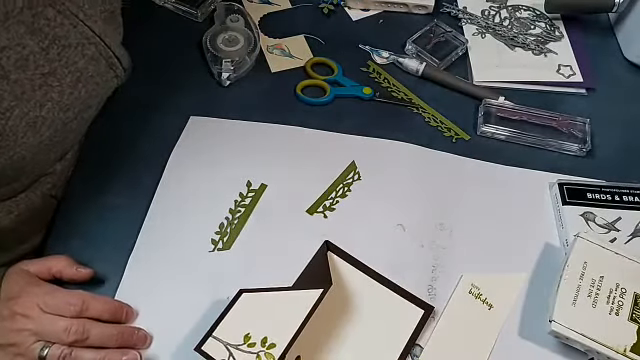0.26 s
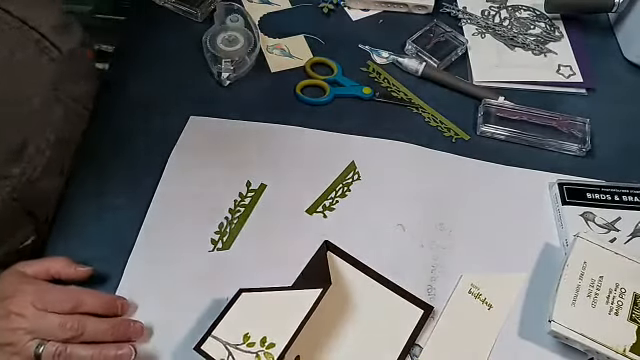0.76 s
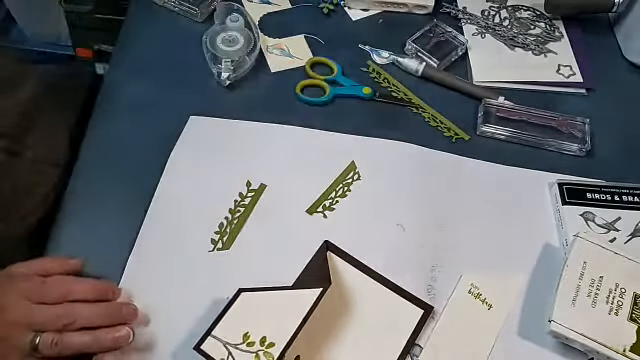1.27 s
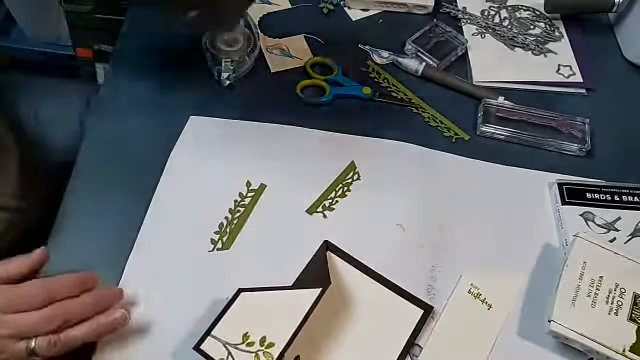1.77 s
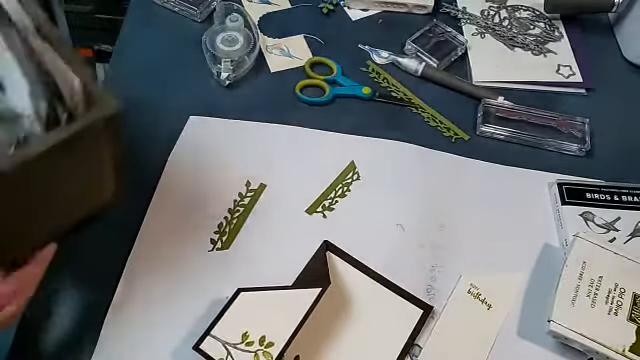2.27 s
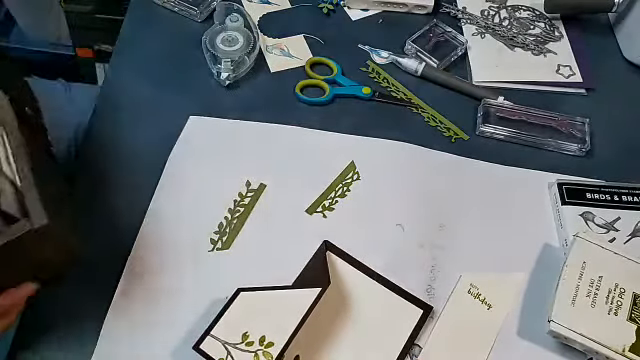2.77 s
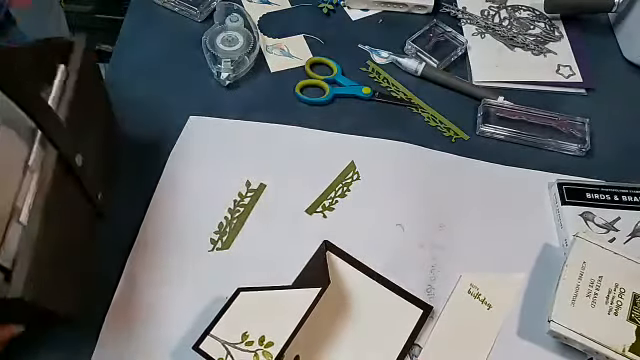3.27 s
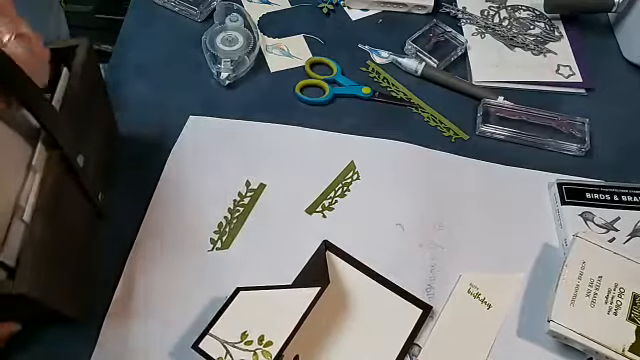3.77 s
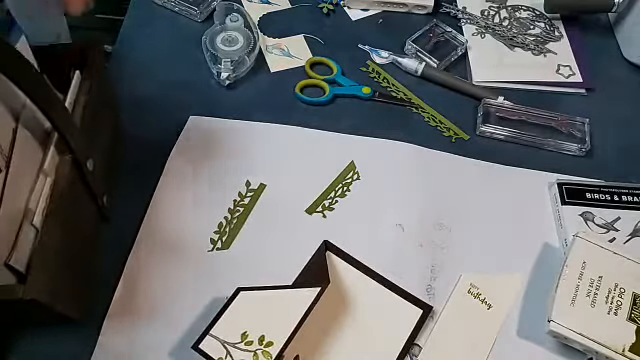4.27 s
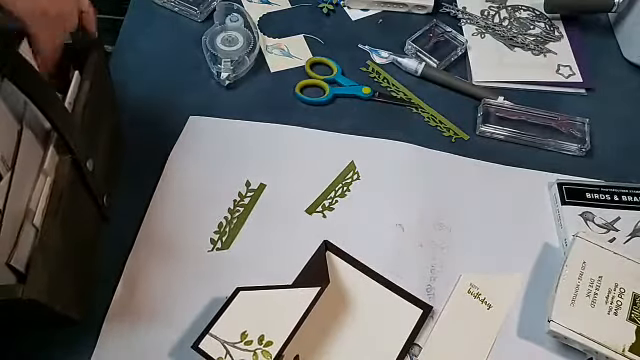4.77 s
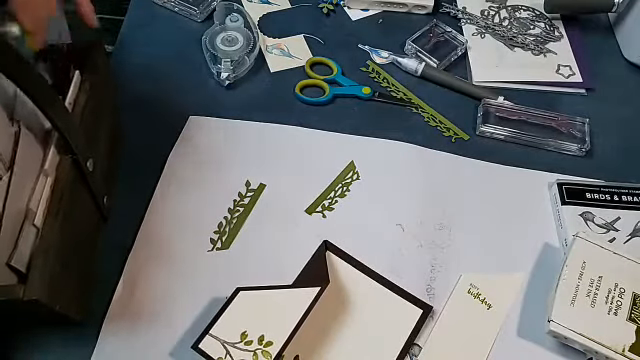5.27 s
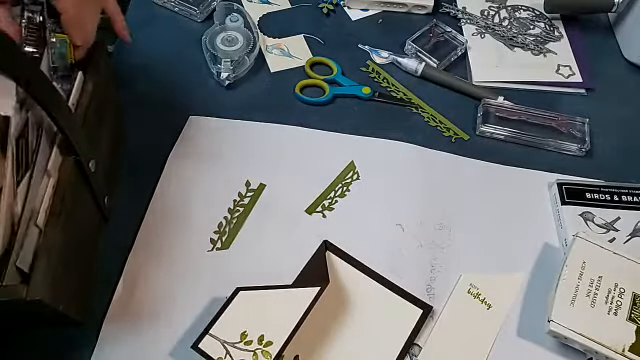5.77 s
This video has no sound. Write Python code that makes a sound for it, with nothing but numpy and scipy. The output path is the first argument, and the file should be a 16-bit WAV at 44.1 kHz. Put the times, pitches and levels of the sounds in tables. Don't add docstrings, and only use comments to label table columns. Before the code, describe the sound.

Sharp clicks and paper scuffs lead into a drawer slamming with a low thud. Quiet follows, broken by dull taps, a muffled rattle and rising creaky ticks. A wooden box lands, and a hand digs through it: irregular bursts of rubbing cards, bright plastic snaps, tiny rings and hollow knocks, until the end. Close-miked in a small, fairly dry room over faint hum and hiss.

```python
import sys
import numpy as np
from scipy import signal
from scipy.fft import rfft, irfft, next_fast_len
from scipy.io import wavfile
from scipy.ndimage import uniform_filter1d

SR = 44100
rng = np.random.default_rng(int(sys.argv[2]) if len(sys.argv) > 2 else 0)


def master_out(mix):
    frames = np.transpose(np.atleast_2d(mix))
    ceiling = np.clip(frames, -1, 1)
    pcm = np.round(ceiling * 32767).astype(np.int16)
    wavfile.write(sys.argv[1], SR, pcm)


def boost(x):
    u = np.asarray(x, float) / 20
    return 10 ** u


N = 265702
HIT_N = 6000
HIT_T_S = np.arange(HIT_N) / SR


def evened(x):
    return x / np.sqrt(np.mean(x ** 2) + 1e-20)


def peaked(x):
    return x / np.sqrt(uniform_filter1d(x ** 2, size=130).max() + 1e-20)


def read(points, hz):
    point_hz, value = np.transpose(points)
    return np.interp(np.log(hz + 1), np.log(point_hz + 1), value)


def add(mix, start_s, sound):
    part = mix[round(start_s * SR):][:len(sound)]
    part += sound[:len(part)]


def colour(x, points):
    size = next_fast_len(len(x))
    gain = boost(read(points, np.fft.rfftfreq(size, 1 / SR)))
    return evened(irfft(rfft(x, size) * gain, size)[:len(x)])


def ring(x, pitch_hz, width_hz):
    pole = np.exp((2j * np.pi * pitch_hz - np.pi * width_hz) / SR)
    return (1 - abs(pole)) * signal.lfilter([1], [1, -pole], x).real


def ring_twice(x, pitch_hz, width_hz):
    return ring(ring(x, pitch_hz, width_hz), pitch_hz, width_hz)


def wood(x, body):
    lowest_hz = min(pitch_hz for pitch_hz, width_hz, level_db in body)
    x = signal.sosfilt(signal.butter(2, 0.5 * lowest_hz, "high", fs=SR, output="sos"), x)
    return evened(sum(boost(level_db) * ring_twice(x, pitch_hz, 2.64 * width_hz) / np.sqrt(width_hz)
                      for pitch_hz, width_hz, level_db in body))


def fall(t60_s, rise_s):
    return (1 - np.exp(-HIT_T_S / rise_s)) * boost(-60 * HIT_T_S / max(t60_s, .01))


# pitch_hz, density_db [dB per Hz]
HUM = [(15, -62.5), (25, -24.5), (41, -13.5), (65, -3), (80, -16), (108, -25), (300, -36), (600, -91)]
# start_s, level_db
SWAY = [(0.0, -70), (0.35, -62), (0.48, -57), (0.64, -60), (0.85, -65.5), (1.49, -68.5), (1.61, -64),
        (1.99, -66.5), (2.7, -69), (2.77, -65), (3.2, -60.5), (3.52, -59.5), (3.64, -66.5), (4.07, -60),
        (4.19, -65.5), (4.49, -65), (4.93, -64.5), (6.02, -65)]
# pitch_hz, density_db [dB per Hz]
HISS = [(210, -34.5), (350, -1), (1610, -3), (4040, -7.5), (8260, -16), (11500, -7), (13700, -1),
        (15600, -4.5)]


def hum():
    rumble, hiss = rng.standard_normal((2, N))
    sway_db = 2.5 + np.interp(np.arange(N) / SR, *np.transpose(SWAY))
    return boost(sway_db) * colour(rumble, HUM) + boost(-78.5) * colour(hiss, HISS)


def patchy(x, patchy_db):
    z = signal.stft(x, nperseg=256, noverlap=192)[2]
    patches = uniform_filter1d(rng.standard_normal(z.T.shape), size=22, axis=0)
    patches = uniform_filter1d(patches, size=5, axis=1)
    z = z * boost(patchy_db * evened(patches).T)
    return evened(signal.istft(z, nperseg=256, noverlap=192)[1][:N])


# start_s, pitch_hz
RUNNER = [
    (0.336, 734),
    (0.398, 880),
    (0.459, 1055),
    (0.511, 916),
    (0.902, 882),
]


def runner(grain):
    pitch_hz = np.interp(np.arange(N) / SR, *np.transpose(RUNNER))
    turn = np.exp(2j * np.pi * np.cumsum(pitch_hz) / SR)
    return evened((turn * ring_twice(grain, 0, 500)).real)


# pitch_hz, width_hz, level_db
BOX = [(121.3, 53, -1), (241, 92, 0), (474, 140, 3.5), (574, 86, -4), (753, 120, 0), (990, 140, -5.5)]
# pitch_hz, density_db [dB per Hz]
PAPER = [(500, -33.5), (1100, -3.5), (1600, -8), (2300, -4), (3000, -9.5), (4200, -10.5), (6000, -19),
         (9000, -29)]
# pitch_hz, level_db
SHEEN = [(3500, -13), (6000, 2.5), (9000, -3), (15000, 2), (16000, 1.5)]
# start_s, length_s, rub_db, wood_rel_db,
# hiss_rel_db
STROKES = [(0.0, 0.075, -54, -7.5, -6), (0.159, .15, -57.5, 0.5, -3.5), (0.337, 0.14, -64.5, 10, -9),
           (0.487, 0.072, -58, 17, -27), (0.59, 0.17, -61, 7, -9), (1.45, 0.4, -82, 4, -12.5),
           (1.957, 0.14, -63, -1.5, -21), (2.255, 0.34, -76, -8, 4), (2.638, 0.073, -67, -3.5, 5),
           (2.819, 0.047, -78.5, -24, 7), (2.988, 0.18, -73.5, -2.5, -12), (3.337, 0.18, -58.5, 4, -11.5),
           (3.615, 0.11, -65, -4, 7.5), (3.728, 0.26, -54.5, 3, -11.5), (3.921, 0.18, -64.5, -7, -5),
           (4.138, 0.14, -60, -2, -0.5), (4.536, .15, -59, -3, -7.5), (4.726, 0.13, -53, 1, -8),
           (4.922, 0.16, -73.5, -11, 4.5), (5.263, 0.097, -68, -10, 3), (5.394, 0.083, -67, 9.5, -6),
           (5.548, 0.23, -66, 2.5, -10), (5.79, 0.27, -78.5, -9.5, 1.5),
           (.53, 0.04, -63, -11.5, 11), (.22, 0.097, -69, -9, -9), (5.432, 0.062, -62.5, 5, -16),
         (7.8, .06, -71.5, 1, -8), (5.98, .04, -81.5, -5, 7.5), (2.7, 0.57, -83, -11, -2),
         (3.67, 0.035, -57.5, -2, -1), (2.4, 0.059, -56, -8.5, -5), (4, 0.042, -64.5, 2, -8),
         (0.8, 0.065, -79, -8, 2.5), (4.331, 0.061, -72, -6, -8), (5.1, 0.21, -85, -2, 7.5)]


def rubbing():
    rise_db_per_s, fall_db_per_s, slips_per_s = 898.5, 264, 900
    card_hz = 1590
    t_s = np.arange(N) / SR
    clumps = boost(0.61 * evened(uniform_filter1d(rng.standard_normal(N), size=500)))
    slips = boost(3 * np.minimum(rng.exponential(1, N), 2.5)) * (rng.random(N) < slips_per_s / SR)
    slips = evened(slips * rng.standard_normal(N))
    grain = patchy(clumps * (slips + 2 * rng.standard_normal(N)), 2)
    paper = evened(colour(grain, PAPER) + .5 * evened(ring(grain, card_hz, 98)))
    scraping = (t_s > .335) & (t_s < .56)
    body = np.where(scraping, runner(grain), wood(grain, BOX))
    layers = [paper, body, colour(grain, SHEEN)]
    coarse_s, power = t_s[::64], 0
    for start_s, length_s, rub_db, wood_rel_db, hiss_rel_db in STROKES:
        lost_db = rise_db_per_s * np.maximum(start_s - coarse_s, 0)
        lost_db += fall_db_per_s * np.maximum(coarse_s - start_s - length_s, 0)
        power = power + boost(rub_db - lost_db + np.array([[0], [wood_rel_db], [hiss_rel_db]])) ** 2
    return sum(layer * np.interp(t_s, coarse_s, np.sqrt(p)) for layer, p in zip(layers, power))


# start_s, click_db, treble_rel_db, t60_s
DRAWER_FRONT = [(.0244, -39.5, 1.5, 0.046), (.0535, -28, -4, 0.063), (.069, -36.5, -26, 0.043),
                (.158, -49, 8, 0.032), (.1615, -38, 8, 0.043), (.1645, -33, 9.5, 0.064),
                (.4374, -41, 5, 0.037), (.4976, -42, -28, .038), (.506, -36.5, -34, 0.22),
                (.558, -23, 3, .053), (.7245, -34, -13, 0.071)]
DRAWER_LOAD = [
    (.3383, -44, -5, 0.033),
    (.5305, -32, 8.5, 0.081),
    (.5763, -27, -4.5, 0.045),
    (.635, -62.5, -10.5, .053),
    (.6644, -43, -7, .034),
    (.6728, -28.5, -1.5, 0.058),
    (.7316, -36.5, 3, 0.052),
]
CARDS = [(2.8432, -67.5, 12, 0.2), (3.0394, -62, 4, 0.26), (3.3178, -55.5, 0.5, 0.086),
         (3.3433, -43, -10, 0.25), (3.3633, -37, -3, 0.15), (3.465, -46, -17, .12),
         (3.6035, -66, -27, 0.19), (3.6344, -70, 3, .082), (3.7277, -34.5, -8.5, .052),
         (3.7371, -30.5, -7, 0.11), (4.134, -42, -2.5, 0.04), (4.2183, -37, -25, 0.055),
         (4.2363, -38.5, -26.5, 0.065), (4.3374, -50, -29.5, 0.029), (4.8054, -22, -24, .037),
         (5.2631, -71, -1, .21), (5.2776, -52, -6.5, .05), (5.3038, -45.5, 3.5, .038),
         (5.3314, -39, -8, 0.078), (5.3976, -38.5, -5, 0.051), (5.453, -27, -37, .07),
         (5.667, -29.5, -3, 0.049), (5.7111, -33.5, 2.5, 0.062)]
CASES = [(3.5203, -37.5, -5.5, 0.067), (3.7694, -19.5, -23, 0.049), (3.7977, -27, -6.5, 0.07),
         (3.8193, -36, -30, 0.074), (3.838, -35.5, -1, 0.053), (3.9429, -26, -1.5, 0.11),
         (4.2719, -37.5, -9, 0.044), (4.5977, -36.5, -15, 0.1), (4.744, -40.5, -7.5, 0.32),
         (4.7571, -34.5, -15, 0.15), (4.7799, -28, -15, 0.17)]
BLOCKS = [
    (3.408, -40.5, -17, 0.064),
    (3.4959, -39, -21, 0.11),
    (4.5592, -53, -15, 0.034),
    (5.434, -49, -25, .1),
    (5.5275, -50.5, -8, .08),
    (4.5716, -36.5, -13, 0.023),
    (5.5757, -39, -16, 0.16),
    (5.5982, -30.5, -13, 0.046),
]
PADS = [(3.1178, -72, 22.5, 0.17), (3.1198, -49.5, -5.5, 0.14), (3.89, -37.5, -4, 0.11),
        (3.899, -37.5, -5, 0.12), (3.9065, -33.5, 3.5, 0.089), (3.924, -36.5, 1, 0.02),
        (3.9348, -28, -0.5, 0.056), (3.9604, -37.5, 2.5, 0.079), (4.5137, -48.5, 10, 0.1),
        (4.6287, -31.5, 6, 0.066), (4.6668, -37.5, 3.5, 0.1), (4.8304, -24.5, -18, 0.084),
        (5.443, -34.5, -34, 0.15), (5.7022, -19.5, -35, 0.027)]
BEADS = [(3.4511, -43.5, -10, 0.028), (4.0482, -50, -10, 0.063), (4.7255, -38.5, -0.5, 0.043),
         (4.793, -34, -11, .03), (3.366, -46, -4, 0.025), (4.8434, -40, -4, 0.16),
         (4.9107, -52, -24, 0.028), (4.9348, -46.5, 1, 0.046), (4.9688, -58, -11, 0.044),
         (4.98, -49, -2.5, 0.12), (5.0134, -44.5, -24, 0.048), (5.0409, -46, 1, 0.052),
         (5.1185, -62, -1.5, 0.098), (5.3478, -35.5, 6, 0.08)]
# pitch_hz, width_hz, level_db
PLASTIC = [(3000, 850, -4), (3513, 300, -6), (4340, 1100, 3), (4860, 350, -7.5), (5200, 350, -4)]


def clicks():
    # contacts, ring_hz, upper_rel_db
    objects = [(DRAWER_FRONT, 2450, -5.5), (DRAWER_LOAD, 1900, -9), (CARDS, 1580, -5.5),
               (CASES, 1644, 0.64), (BLOCKS, 1340, -15), (PADS, 1930, -3.3), (BEADS, 2630, 1.67)]
    upper_per_treble = 0.77
    rows = sorted((*row, ring_hz, upper_db) for contacts, ring_hz, upper_db in objects for row in contacts)
    out, noise = np.zeros(N), rng.standard_normal((len(rows), 3, HIT_N))
    detune = rng.uniform(0.86, 1.1, (len(rows), len(PLASTIC)))
    crack = 1.5 * fall(0.0066, 0.000067)
    slide_in = 0.31 * fall(0.054, .0002)[:880][::-1]
    for row, (low, high, snap), shifts in zip(rows, noise, detune):
        start_s, click_db, treble_db, t60_s, ring_hz, upper_db = row
        sudden = boost(-2 * max(treble_db, 0))
        scuff = np.r_[sudden * slide_in, fall(t60_s, .012 * t60_s) + crack][:HIT_N]
        sound = evened(ring(low * scuff, ring_hz, 320))
        sound = peaked(sound + 0.57 * colour(low, PAPER) * evened(scuff))
        brief = high * scuff * boost(-300 * HIT_T_S)
        upper = sum(boost(level_db) * ring_twice(brief, pitch_hz * shift, width_hz)
                    for (pitch_hz, width_hz, level_db), shift in zip(PLASTIC, shifts))
        sound += boost(upper_db + upper_per_treble * treble_db) * peaked(upper)
        sound += boost(treble_db) * peaked(colour(snap, SHEEN) * scuff)
        add(out, start_s - 900 / SR, boost(click_db - 7) * sound)
    return out


# start_s, level_db, pitch_hz, t60_s
THUMPS = [(0.046, -44, 76, 0.12), (0.531, -23.5, 180, 0.15), (0.538, -21.5, 76.6, 0.1),
          (0.555, -24.5, 166, 0.15), (0.574, -29.5, 60, 0.099), (0.675, -29.5, 98.3, 0.24),
          (0.733, -38, 110, 0.15), (1.789, -43, 87.3, 0.024), (2.028, -53, 230, 0.094),
          (2.985, -47, 115.3, 0.14), (3.008, -39, 60.2, 0.038), (3.339, -26.5, 231, 0.045),
          (3.349, -27.5, 252, 0.014), (3.15, -51, 60.3, 0.16), (3.602, -54, 61.5, 0.15),
          (3.849, -57, 60.6, 0.23), (0.409, -48, 130, 0.092), (2.18, -59.5, 142, 0.12),
          (1.802, -58, 342, 0.087), (3.367, -24, 75, 0.033), (3.379, -31, 66, 0.097),
          (3.414, -34.5, 125, 0.15), (3.439, -39.5, 69, 0.33), (3.53, -42.5, 136, 0.13),
          (4.791, -45, 84, 0.7), (5.726, -45, 66, 0.16)]


def thumps():
    out = np.zeros(N)
    sagging_s = HIT_T_S + 0.0043 * (1 - np.exp(-HIT_T_S / 0.0017))
    for start_s, level_db, pitch_hz, t60_s in THUMPS:
        swing = np.sin(2 * np.pi * pitch_hz * sagging_s)
        add(out, start_s, boost(level_db + 3.5) * swing * fall(min(t60_s, 14 / pitch_hz), 0.0024))
    return out


# start_s, level_db, t60_s
DRAWER_PANEL = [(.159, -41.5, 0.058), (.338, -33, 0.019), (.376, -41, 0.04), (.4, -43, 0.14),
                (.504, -37, 0.3), (.53, -16.5, 0.02), (.556, -14, 0.035), (.635, -60, 0.056),
                (.673, -27, 0.028), (.731, -20.5, 0.021), (.856, -62, 0.057), (3.86, -40.5, 0.058)]
DIVIDER = [(.054, -35.5, 0.035), (.435, -36.5, 0.035), (3.498, -47.5, 0.097), (3.767, -23.5, 0.027),
           (3.795, -36.5, 0.25), (4.237, -39, 0.074), (4.665, -45.5, 0.025), (5.332, -49, 0.22),
           (5.598, -41, .06), (5.667, -43, 0.097), (5.706, -36, 0.038), (.558, -25.5, .05),
           (4.83, -24.5, 0.035)]
BOTTOM = [
    (.213, -52.5, 0.042),
    (1.778, -50.5, 0.038),
    (3.342, -45, 0.084),
    (3.408, -42, 0.04),
    (3.518, -42.5, 0.091),
    (4.28, -40.5, 0.027),
    (4.775, -33, 0.091),
    (5.454, -24.5, 0.074),
    (5.465, -30, 0.048),
]
WALL = [
    (3.737, -37, 0.22),
    (3.923, -33, 0.057),
    (4.599, -43, 0.14),
    (4.757, -34, 0.12),
    (4.829, -22.5, 0.024),
    (5.6, -28.5, 0.015),
    (5.667, -38, 0.047),
    (5.705, -25.5, 0.03),
]


def hollow():
    # knocks, note_hz, width_hz, near_rel_db
    panels = [(DRAWER_PANEL, 862, 120, 1.5), (DIVIDER, 1090, 120, 1),
              (BOTTOM, 456, 45, 6), (WALL, 559.4, 125, -12.5)]
    rows = sorted((*row, *note) for knocks, *note in panels for row in knocks)
    out, noise = np.zeros(N), rng.standard_normal((len(rows), HIT_N))
    for (start_s, level_db, t60_s, note_hz, width_hz, near_db), rough in zip(rows, noise):
        modes = [(note_hz, width_hz, 0), (max(0.45 * note_hz, 430), 120, near_db + 0.5),
                 (1.2 * note_hz, 200, near_db - 6)]
        drive = rough + 0.2 * np.cos(2 * np.pi * note_hz * HIT_T_S)
        sound = peaked(wood(drive * fall(t60_s, 0.17 * t60_s), modes))
        add(out, start_s - .001, boost(level_db - 7.5) * sound)
    return out


# start_s, level_db, pitch_hz, t60_s
PINGS = [(3.121, -59.5, 5200, 0.062), (3.769, -42, 3960, 0.074), (3.8, -41.5, 4300, 0.033),
         (3.908, -41, 4220, 0.033), (3.535, -52, 1500, 0.018), (4.934, -53, 3770, 0.027),
         (4.745, -47.5, 5640, 0.018), (.1085, -56.5, 4400, 0.026), (0.054, -50, 2500, 0.043),
         (3.4503, -51, 4040, 0.018), (3.602, -58, 1560, 0.27), (3.708, -50.5, 1700, .03),
         (3.8, -36.5, 1590, 0.088), (4.05, -66.5, 5700, 0.19), (4.336, -57.5, 1790, 0.014),
         (4.513, -47.5, 8260, 0.044), (4.513, -60, 3570, 0.032), (4.627, -45.5, 5950, .04),
         (4.629, -43.5, 3000, 0.017), (4.726, -41, 3530, 0.011), (4.726, -50, 7080, .03),
         (4.76, -41.5, 4000, 0.037), (4.781, -40.5, 4040, 0.033), (4.842, -40, 3920, .03),
         (4.912, -60, 2100, .03), (5.014, -56, 3860, 0.037), (5.039, -54.5, 3910, 0.029),
         (5.304, -56.5, 2217, 0.031), (5.347, -43.5, 3160, 0.013), (5.38, -52, 1580, 0.025),
         (5.578, -46.5, 1440, 0.02), (5.668, -39.5, 4300, 0.01)]


def pings():
    out, noise = np.zeros(N), rng.standard_normal((len(PINGS), HIT_N))
    for (start_s, level_db, pitch_hz, t60_s), rough in zip(PINGS, noise):
        sound = ring_twice(rough * fall(t60_s, 0.00033), pitch_hz, 120 + .1 * pitch_hz)
        add(out, start_s - .001, boost(level_db + 3) * peaked(sound))
    return out


# start_s, level_db, treble_rel_db
TAPS = [
    (1.428, -58, -40),
    (1.493, -68, -23.5),
    (1.557, -49.5, -18),
    (1.597, -49.5, -37),
    (1.71, -48.5, -14.5),
    (1.778, -68.5, -36),
]
RATTLE = [
    (1.947, -49.5, -11),
    (1.972, -47.5, -17),
    (2.002, -46, -28),
    (2.024, -45, -32),
    (2.05, -45.5, -39),
    (2.082, -45, -24),
]
CREAKS = [
    (2.179, -56, -14.5),
    (2.257, -45.5, -11),
    (2.35, -41, -9),
    (2.428, -38.5, -12),
    (2.514, -38.5, -8.5),
    (2.634, -41, -7.5),
]
# pitch_hz, width_hz, level_db
TAP_MODES = [(180, 114, 3.5), (424, 420, 0), (797, 150, 6), (1060, 160, 6), (1500, 56, 5.5),
             (2170, 49, 1.5), (2480, 150, -18), (2890, 120, -8.5), (4080, 430, -9), (5450, 170, -18.5)]
RATTLE_MODES = [(173, 49, -2.5), (339, 200, 0), (796, 225, 3), (1057, 88, 0.5), (1550, 130, 0.5),
                (2010, 170, -8), (2920, 96, -9.5), (4300, 230, -8), (5420, 280, -14.5)]
CREAK_MODES = [(606, 170, -1), (770, 70, 9.5), (853, 49, -9.5), (1030, 46, -4), (1780, 58, 0.5),
               (2078, 105, 6.5), (2160, 88, 2), (2500, 47, 4.5), (2756, 55, 1), (2890, 110, 2.5),
               (3570, 86, -1), (4370, 200, -4.5), (4950, 370, -1)]
# pitch_hz, level_db
MUFFLED = [(3000, -12.5), (4500, 2), (6500, -2), (8000, -14), (16000, -27)]


def taps(rows, modes, treble, t60_s, crack, blow):
    out, noise = np.zeros(N), rng.standard_normal((len(rows) + 1, 2, HIT_N))
    shared = 2.5 * noise[0, 0]
    scuff = fall(t60_s, 0.0019) + crack * fall(0.0066, 0.00059)
    strike = blow * (np.arange(HIT_N) == 40)
    for (start_s, level_db, treble_db), (rough, snap) in zip(rows, noise[1:]):
        sound = peaked(wood((shared + rough) * scuff + strike, modes))
        sound += boost(treble_db) * peaked(colour(snap, treble) * scuff)
        add(out, start_s - .001, boost(level_db - 2.0) * sound)
    return out


# pitch_hz, t60_s
ROOM = [(100, 0.3), (600, 0.088), (2500, 0.091), (8000, 0.087), (16000, 0.05)]


def room(x):
    echoes = np.zeros(SR // 2)
    at = np.arange(150, SR // 2 - 20, 20)
    echoes[at + rng.integers(0, 20, len(at))] = rng.choice([-1., 1.], len(at))
    hz, t_s, z = signal.stft(echoes, SR, nperseg=256)
    z = z * boost(-60 * t_s / read(ROOM, hz)[:, None])
    tail = signal.istft(z, SR, nperseg=256)[1]
    return signal.fftconvolve(x, tail / np.linalg.norm(tail))[:N]


def scene():
    hits = clicks() + hollow() + pings()
    hits += taps(TAPS, TAP_MODES, MUFFLED, t60_s=0.12, crack=0.38, blow=31)
    hits += taps(RATTLE, RATTLE_MODES, MUFFLED, t60_s=.075, crack=.6, blow=25)
    hits += taps(CREAKS, CREAK_MODES, SHEEN, t60_s=0.11, crack=0.36, blow=69)
    return (hits + boost(-12.0) * room(hits) + rubbing() + thumps() + hum())[None]


def band_limit(x):
    return signal.sosfilt(signal.butter(12, 16820, fs=SR, output="sos"), x)


def record(dry):
    edge = signal.firwin(301, 15760, window=("kaiser", 5), fs=SR)
    dry = signal.sosfilt(signal.butter(2, 32, "high", fs=SR, output="sos"), dry)
    return band_limit(signal.oaconvolve(dry, edge[None], "same"))


dry = scene()
out = record(dry)
master_out(out)
```